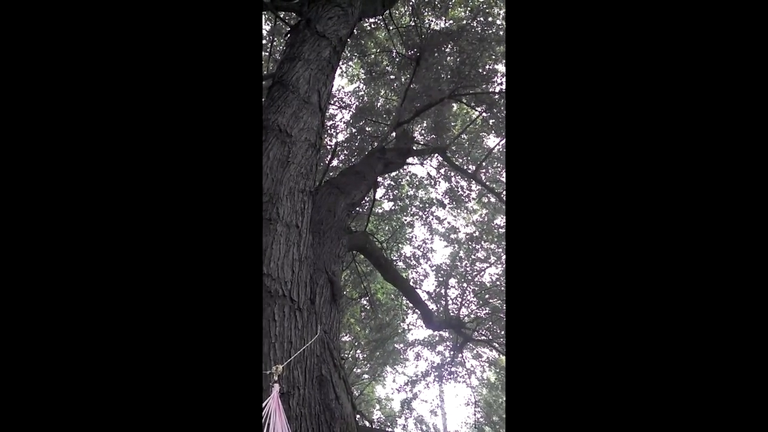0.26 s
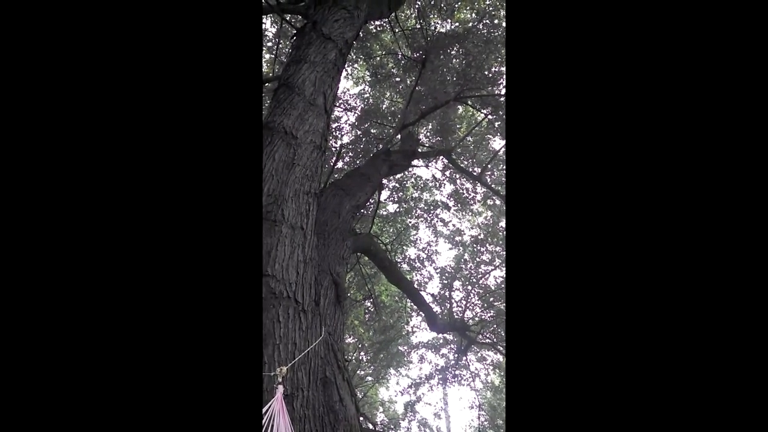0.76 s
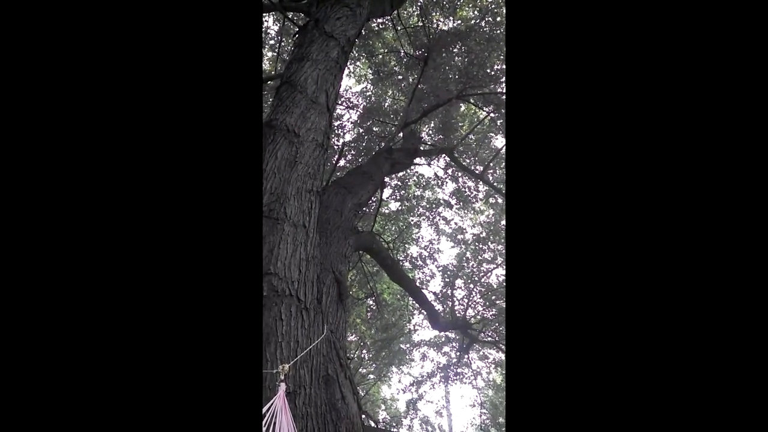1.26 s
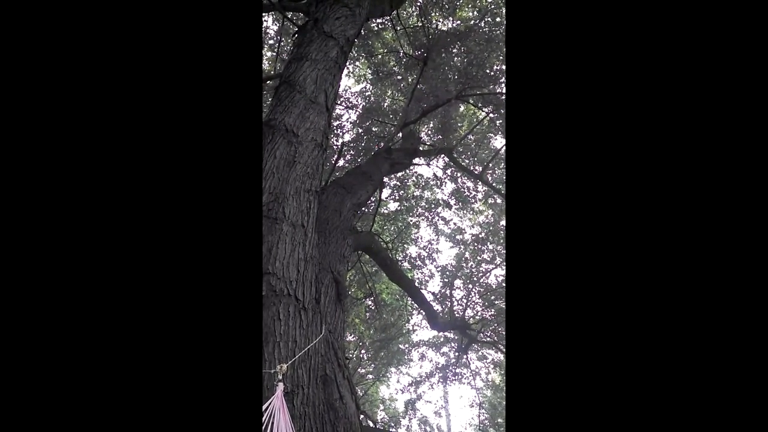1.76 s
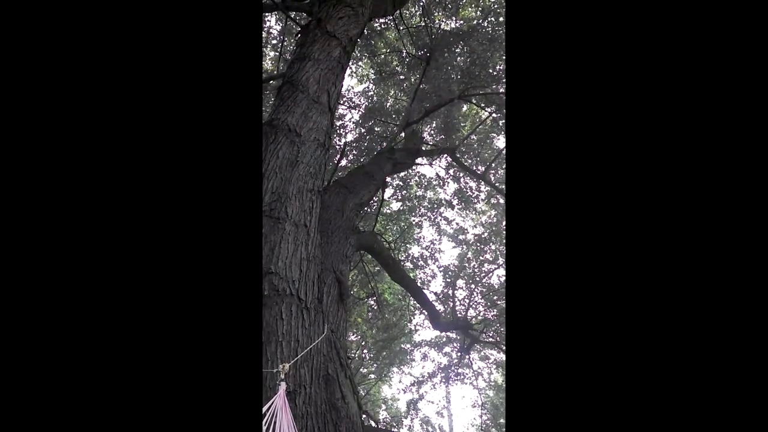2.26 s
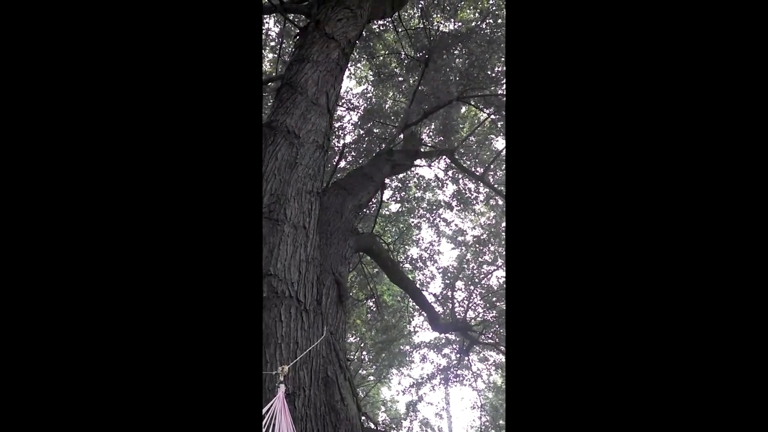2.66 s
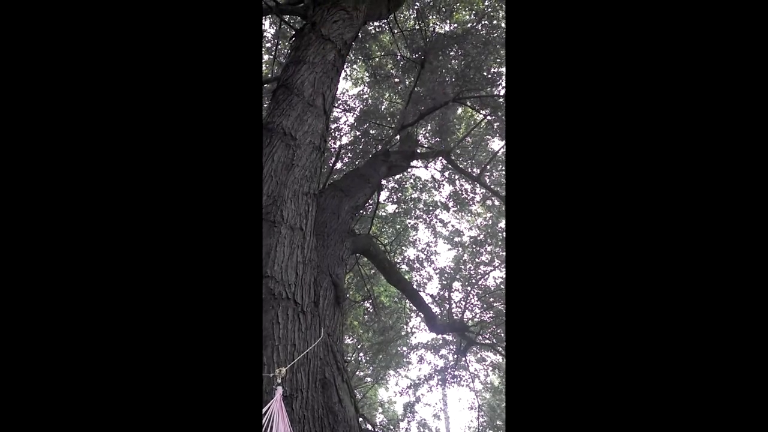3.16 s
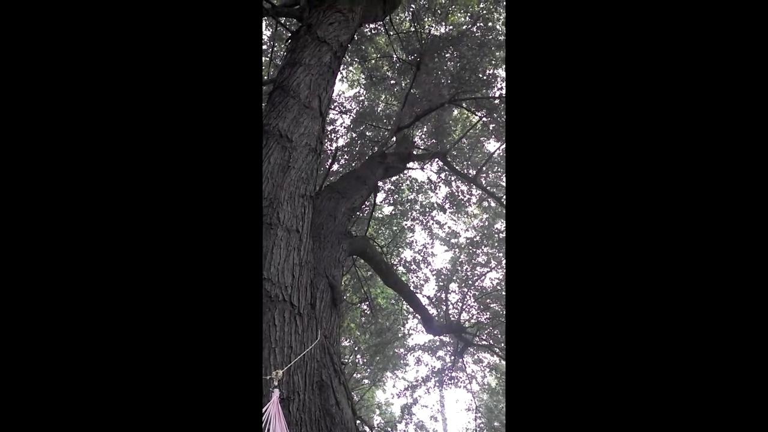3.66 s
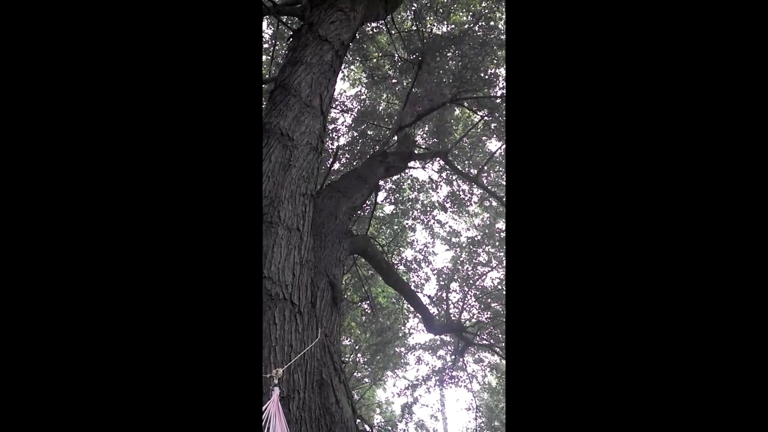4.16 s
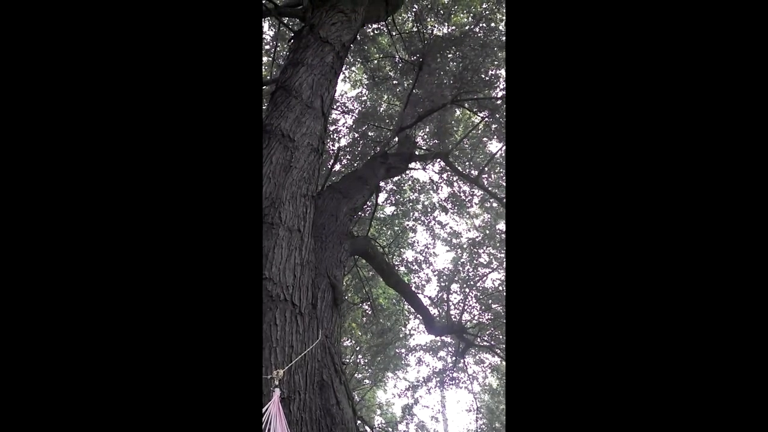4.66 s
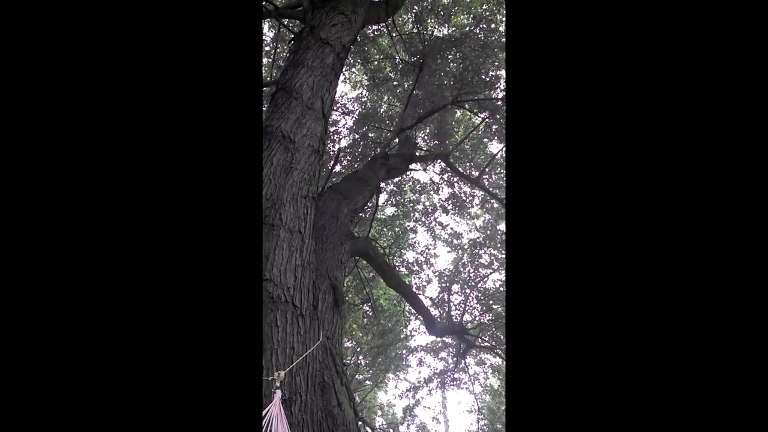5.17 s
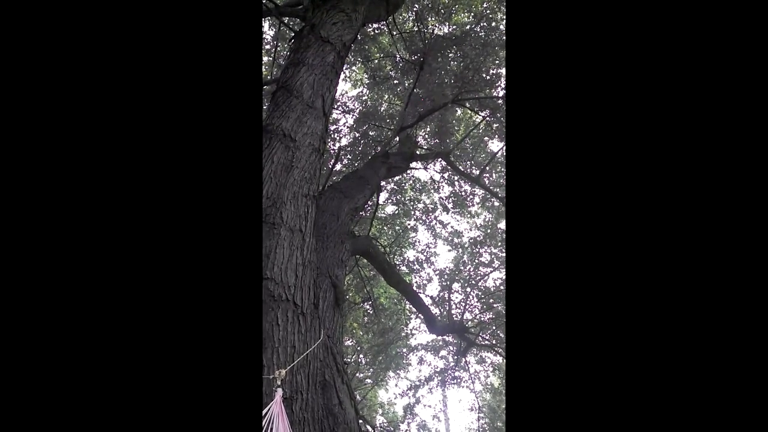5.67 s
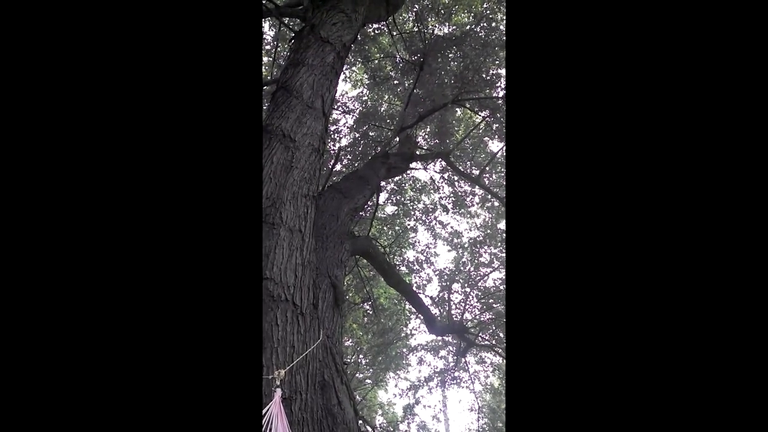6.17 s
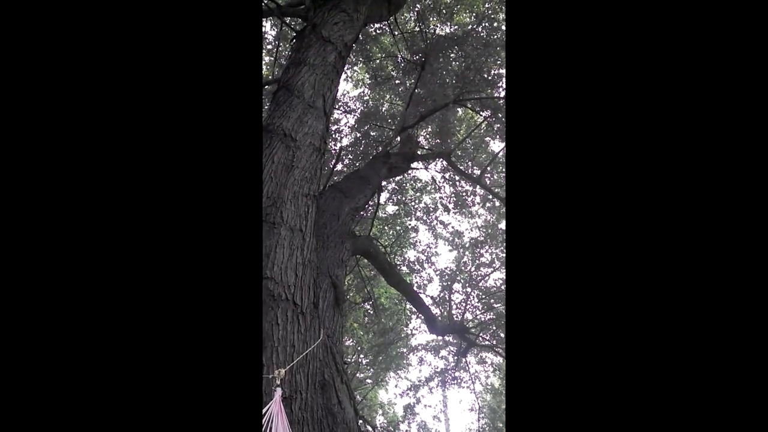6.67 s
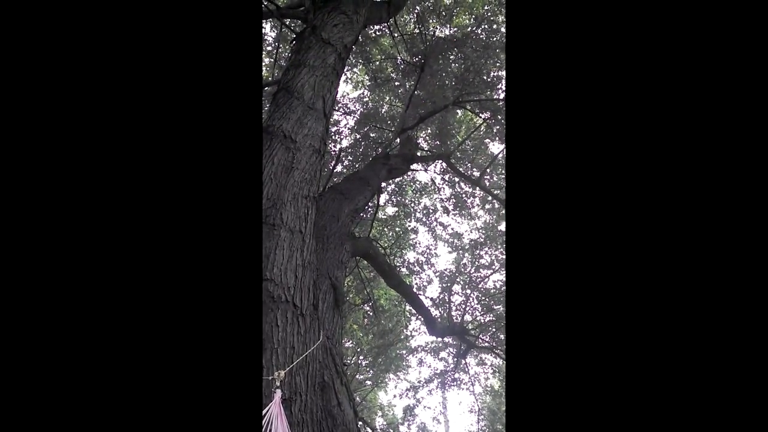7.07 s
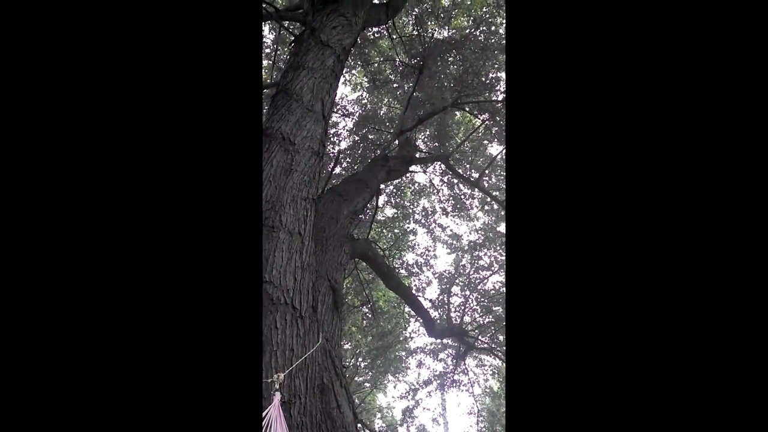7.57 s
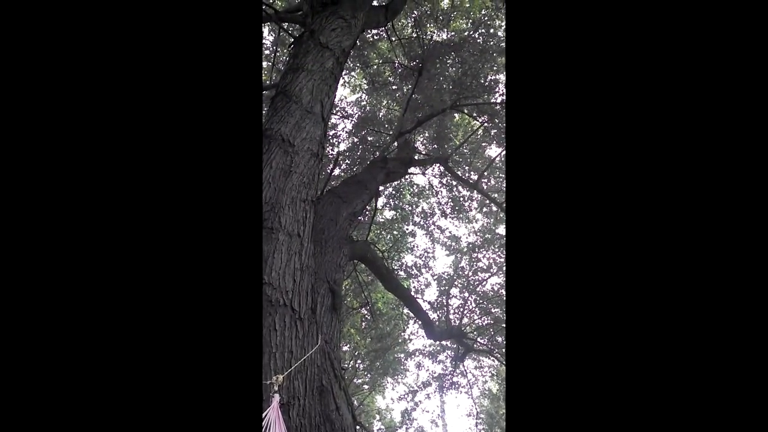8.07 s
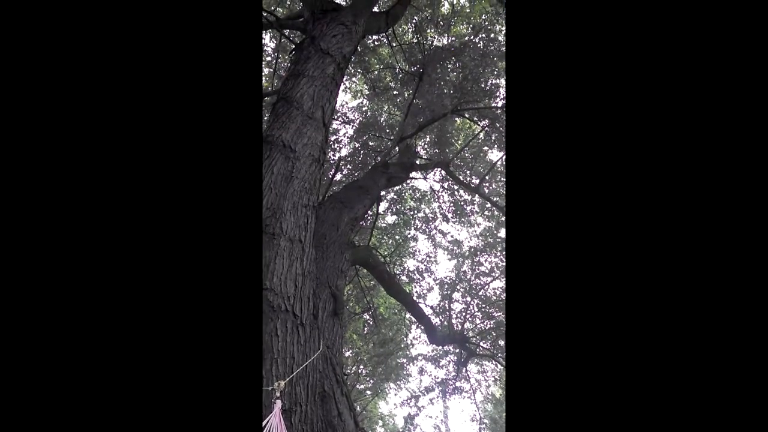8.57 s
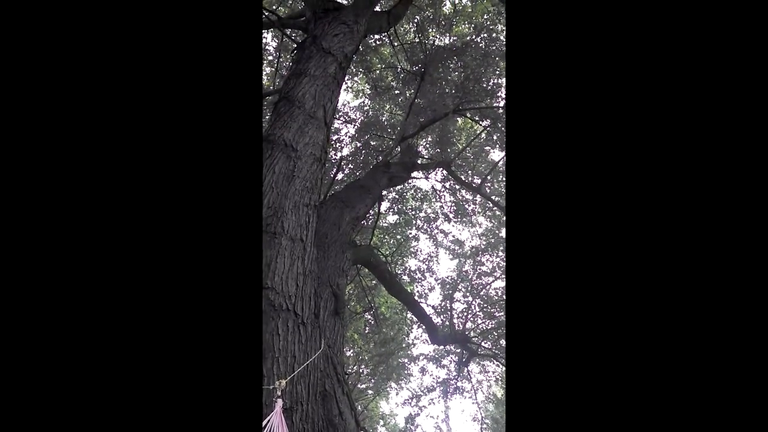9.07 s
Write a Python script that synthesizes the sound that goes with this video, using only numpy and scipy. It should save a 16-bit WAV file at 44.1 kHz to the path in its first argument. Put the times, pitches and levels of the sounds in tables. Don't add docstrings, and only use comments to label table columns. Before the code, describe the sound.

Scolding squirrel: stuttering chirps, strained raspy moans and sparse dry barks, with distant songbirds whistling above a quiet outdoor hush and faint engine hum.

```python
import sys
import numpy as np
from scipy import signal
from scipy.io import wavfile

SR = 44100
rng = np.random.default_rng(int(sys.argv[2]) if len(sys.argv) > 2 else 0)


def generate_wav(sig):
    pcm = np.round(np.clip(np.atleast_2d(sig).T, -1, 1) * 32767).astype(np.int16)
    wavfile.write(sys.argv[1], SR, pcm)


def amplitude_ratio(level_db):
    exponent = np.asarray(level_db, float) / 20
    return 10 ** exponent


N = 411012

BARK_LEAD_S = 0.014


def rms_one(x):
    return x / np.sqrt(np.mean(x ** 2) + 1e-20)


def in_time(rows, t):
    s, *columns = np.transpose(rows)
    return [np.interp(t, s, column) for column in columns]


def span(start, end):
    part = slice(round(start * SR), min(round(end * SR), N))
    return part, np.arange(part.start, part.stop) / SR


def at_hz(points, hz):
    point_hz, value = np.array(points).T
    return np.interp(np.log(hz), np.log(point_hz), value)


def drift(rate, size=N):
    r, run_in = np.exp(-2 * np.pi * rate / SR), int(SR / rate)
    noise = rng.standard_normal(size + run_in)
    return rms_one(signal.lfilter([1], [1, -2 * r, r * r], noise)[run_in:])


def resonate(x, modes):
    out, power = 0, 0
    for k, (hz, width_hz, level_db) in enumerate(modes):
        r = np.exp(-np.pi * width_hz / SR)
        top = (1 - r * r) / 2
        section = [top, 0, -top, 1, -2 * r * np.cos(2 * np.pi * hz / SR), r * r]
        ringing = signal.sosfilt([section, section], x)
        out = out + (-1) ** k * amplitude_ratio(level_db) * ringing
        power += amplitude_ratio(2 * level_db) * np.pi * width_hz / SR / 2
    return out / np.sqrt(power)


def folds(pitch, rough, alternate):
    size = len(pitch)
    waver = 1 + (.004 + .08 * rough ** 2) * drift(250, size)
    phase = 2 * np.pi * np.cumsum(pitch * waver) / SR
    pulses = 0
    for k in range(2, int(16000 / pitch.max()) + 1):
        fall_db = 8 * max(np.log2(k / 4.5), .4 * np.log2(4.5 / k))
        pulses = pulses + np.cos(k * phase) * amplitude_ratio(8 - fall_db + 3.5 * drift(50, size))
    pulses = pulses * np.sqrt(4 * pitch / SR)
    gate = 1 + .5 * np.cos(phase)
    breath = rng.standard_normal(size) * gate * amplitude_ratio(1.5 * drift(250, size))
    every_other = 1 + alternate * np.cos(phase / 2)
    return phase, every_other * np.sqrt(1 - rough) * pulses + np.sqrt(rough) * breath


def moans():
    # (start [s], length [s], first pitch [Hz], settled pitch [Hz], clear note level [dB])
    long_calls = [
        (.998, .315, 1040, 1115, -43),
        (3.981, .322, 915, 1150, -38),
        (9.196, .3, 770, 1075, -35),
    ]
    # (time [s], fundamental peak [dB], pitch [Hz], rasp peak [dB])
    short_calls = [(0.872, -63, 806, -51), (0.911, -64, 835, -46), (.953, -50.5, 890, -38),
                   (3.89, -63, 710, -40), (3.937, -43, 722, -34), (5.311, -63, 773, -47),
                   (5.36, -67, 820, -49), (5.398, -72, 820, -50), (5.44, -60, 773, -39),
                   (5.486, -46.5, 850, -34.5), (5.544, -46, 990, -32), (5.571, -61, 970, -46.5),
                   (9.152, -50.5, 683, -44)]
    # (frequency [Hz], width [Hz], level [dB])
    throat = [(800, 600, -11), (1250, 300, -11), (1680, 350, -11), (2010, 230, 0), (2330, 250, -13),
              (3600, 800, -13), (4480, 380, -7), (5700, 1300, -17), (7200, 1200, -10), (8100, 900, -11),
              (9100, 900, 0), (9750, 600, -5), (12700, 2600, -19), (15400, 450, -14)]
    dull_throat = [(hz, width_hz, db - 7.0 * (hz > 6800)) for hz, width_hz, db in throat]

    calls = [(moan(*row), throat) for row in long_calls]
    calls += [(stammer(), dull_throat)]
    calls += [(chirp(*row), throat) for row in short_calls]
    out = np.zeros(N)
    for (part, pitch, low_db, rasp_db, rough, alternate), mouth in calls:
        phase, airflow = folds(pitch, rough, alternate)
        out[part] += np.sqrt(2) * amplitude_ratio(low_db) * np.sin(phase)
        out[part] += amplitude_ratio(rasp_db) * resonate(airflow, mouth)
    return out


def moan(start, length, first_hz, settled_hz, note_db):
    settle_s, break_takes_s = 0.028, 0.032
    strain_hz, strain_s = 1310, 0.06
    attack_s, release_s, edge_depth_db = 0.007, 0.03, 16
    clear_rough, broken_rough = 0.3, 0.7

    part, t = span(start, start + length)
    age = t - start
    break_s = 0.066 + 5.5e-5 * (920 - first_hz)
    broken = np.clip((age - break_s) / break_takes_s + .5, 0, 1)
    since = np.maximum(age - break_s, 0)

    pitch = settled_hz + (first_hz - settled_hz) * np.exp(-age / settle_s)
    pitch += (strain_hz - settled_hz) * (1 - np.exp(-since / strain_s))

    fade_in = np.maximum(1 - age / attack_s, 0)
    fade_out = np.maximum(1 - (length - age) / release_s, 0) ** 1.16
    edge_db = -edge_depth_db * (fade_in + fade_out)

    clear_note_db = note_db - 64 * age
    broken_note_db = -42.5 - 28 * since
    low_db = (1 - broken) * clear_note_db + broken * broken_note_db

    swell_db = 3 * (1 - (age / length / 0.51 - 1) ** 2)
    clear_rasp_db = -45.5 + 0.03 * (pitch - 1080) + 75 * age
    rasp_db = (1 - broken) * clear_rasp_db + broken * (-36.5 + swell_db)

    rough = clear_rough + (broken_rough - clear_rough) * broken
    return part, pitch, low_db + edge_db, rasp_db + edge_db, rough, .7 * broken


def stammer():
    # (time [s], pitch [Hz], effort [dB], roughness [0-1])
    zigzag = [
        (5.611, 1153, -69, 0.77),
        (5.618, 1172, -43, 0.54),
        (5.637, 1053, -42, 0.58),
        (5.658, 1272, -56, 0.38),
        (5.699, 1127, -48.5, 0.47),
        (5.721, 1186, -48, 0.3),
        (5.736, 1310, -50, 0.4),
        (5.771, 1440, -74, .3),
        (5.785, 1420, -78, 0.1),
    ]
    part, t = span(zigzag[0][0], zigzag[-1][0])
    pitch, effort_db, rough = in_time(zigzag, t)
    rasp_db = -45.5 + 0.33 * (effort_db + 44.5)
    return part, pitch, effort_db, rasp_db, np.clip(rough, 0, 1), .2


def chirp(s, low_db, hz, db):
    length_s = 0.027
    # (time [s], fundamental [dB], rasp [dB])
    rows = [(s - .004, low_db - 12, db - 20),
            (s + 0.0052, low_db + 8.0, db - 14),
            (s + length_s - .006, low_db - 21, db - 22.5),
            (s + length_s, low_db - 21, db - 54)]
    part, t = span(rows[0][0], rows[-1][0])
    blip_db, rasp_db = in_time(rows, t)
    return part, np.full(len(t), float(hz)), blip_db, rasp_db, .75, 0


def barks():
    # (start [s], length [s], top pitch [Hz], chest peak [dB], rasp peak [dB])
    calls = [
        (2.96, 0.087, 430, -43.5, -41.5),
        (3.074, 0.022, 450, -57, -64),
        (7.17, 0.084, 468, -44.5, -40.5),
        (7.481, .066, 412, -48, -44.5),
        (7.804, 0.0737, 466.6, -44.5, -40.5),
        (8.093, 0.065, 430, -45, -40.5),
        (8.583, 0.081, 470, -43.5, -40),
    ]
    # (frequency [Hz], width [Hz], level [dB])
    chest = [(430, 260, -2), (880, 450, -2), (1350, 500, 0), (2000, 700, -8)]
    open_mouth = [(676, 180, 6.5), (1455, 240, -2.5), (1776, 210, -2.5), (2430, 190, 6), (3380, 73, -11)]
    teeth = [(3500, 500, -15), (4650, 400, -13), (6000, 600, -11), (6900, 1300, -6), (8300, 1200, -8),
             (10000, 1300, 0), (12300, 2200, -6), (14900, 1500, -5)]
    breaks_s = 0.052

    out = np.zeros(N)
    for call in calls:
        rows = bark_shape(*call)
        part, t = span(rows[0][0], rows[-1][0])
        pitch, chest_db, rasp_db = in_time(rows, t)
        opening = np.clip((t - t[0] - BARK_LEAD_S) / breaks_s - .2, 0, 1) ** 1.5
        phase, airflow = folds(pitch, .3 + .6 * opening, 0)
        airflow += 2.0 * np.sqrt((1 - opening) * 4 * pitch / SR) * np.cos(phase)
        closed_voice = np.sqrt(1 - opening) * resonate(airflow, chest) * amplitude_ratio(-2.5)
        open_voice = np.sqrt(opening) * resonate(airflow, open_mouth)
        gate = 1 + .4 * np.cos(phase)
        hiss = rng.standard_normal(len(t)) * gate * amplitude_ratio(1.8 * drift(150, len(t)))
        bark = amplitude_ratio(chest_db + 4.53) * (closed_voice + open_voice)
        bark += amplitude_ratio(rasp_db + 8.0) * resonate(hiss, teeth)
        out[part] += signal.windows.tukey(len(t), .2) * bark
    return out


def bark_shape(start, length, top_hz, chest_db, rasp_db):
    # (at the thump [dB], at the dip [dB], at the end [dB])
    chest_drop = (-2.5, -4, -9)
    rasp_drop = (-9, -4, -16)
    first_hz, last_hz, lead_db = 366.7, 430, -23
    dip_hz = first_hz + 0.588 * (top_hz - first_hz)
    thump_rasp_db = rasp_db + rasp_drop[0]
    return [(start - BARK_LEAD_S, first_hz, chest_db + 2 * lead_db, thump_rasp_db + lead_db),
            (start - .001, first_hz, chest_db + 2 * lead_db, thump_rasp_db + lead_db / 2),
            (start + 0.0057, first_hz, chest_db + chest_drop[0], thump_rasp_db),
            (start + 0.227 * length, dip_hz, chest_db + chest_drop[1], rasp_db + rasp_drop[1]),
            (start + 0.69 * length, top_hz, chest_db, rasp_db),
            (start + length, last_hz, chest_db + chest_drop[2], rasp_db + rasp_drop[2])]


def songbirds():
    out = np.zeros(N)
    flutter = amplitude_ratio(3.5 * drift(60))
    warble = 1 + .012 * drift(60)
    for start, length, first_hz, last_hz, level_db in bird_notes():
        part, t = span(start, start + length)
        glide = np.linspace(first_hz, last_hz, len(t)) * warble[part]
        whistle = np.sin(2 * np.pi * np.cumsum(glide) / SR)
        out[part] += amplitude_ratio(level_db + 1.5) * signal.windows.tukey(len(t), .5) * whistle
    return out * flutter


def bird_notes():
    # (start [s], length [s], pitch [Hz], level [dB])
    whistles = [(0.856, 0.06, 3370, -57), (1.45, .12, 3050, -63), (1.81, 0.051, 3190, -59),
                (1.888, .07, 2650, -56), (2.782, 0.076, 2100, -59), (1.955, .03, 4700, -64),
                (3.046, .04, 3700, -53), (3.469, 0.066, 3150, -53.5), (3.767, 0.06, 3530, -51),
                (3.79, 0.045, 2120, -55.5), (3.856, .08, 2290, -47), (5.923, 0.17, 2680, -50),
                (5.953, 0.2, 2353, -52), (7.078, .11, 2366, -48), (7.04, .04, 3420, -65),
                (7.55, 0.046, 2500, -58), (8.168, 0.065, 2570, -53), (8.68, 0.031, 3200, -58),
                (8.998, 0.062, 2620, -56), (2.65, 0.11, 2600, -53), (3.271, 0.13, 2590, -51)]
    # (start [s], length [s], first pitch [Hz], last pitch [Hz], level [dB])
    slurs = [(0.433, .1, 3500, 3120, -62), (2.4, 0.071, 2590, 3170, -53), (3.232, 0.1, 3930, 4360, -60),
             (3.653, 0.067, 4390, 3470, -53.5), (3.714, 0.056, 3000, 3250, -50),
             (4.56, .05, 2700, 3100, -51), (6.029, 0.045, 2300, 2070, -61), (8.947, .06, 2065, 2500, -59),
             (4.421, 0.17, 2690, 2384, -47.5), (5.381, 0.16, 2700, 2342, -44),
             (5.817, 0.089, 2570, 2950, -42), (6.987, 0.14, 2714, 2450, -44)]
    # (time into it [s], length [s], first pitch [Hz], last pitch [Hz], level [dB])
    phrase = [
        (0, .05, 2750, 2830, -52),
        (.07, .18, 2950, 2990, -58),
        (.05, .15, 3670, 3650, -56),
        (.1, .22, 2290, 2285, -55),
    ]
    # (time [s], gain [dB])
    phrase_starts = [
        (4.81, 0.24),
        (6.36, -0.76),
    ]
    # (start [s], chips [count], first level [dB], rise per chip [dB])
    trills = [
        (2.08, 10, -57, 0.64),
        (6.275, 5, -60.5, 1),
    ]
    # (length [s], first pitch [Hz], last pitch [Hz])
    chip = (0.026, 4550, 4900)
    gap_s, hurry_s, hurry_kept = 0.122, 0.02, 0.55

    sung = [(s, length, hz, hz, db) for s, length, hz, db in whistles] + slurs
    for start, gain_db in phrase_starts:
        for s, length, first_hz, last_hz, db in phrase:
            sung.append((start + s, length, first_hz, last_hz, db + gain_db))
    for start, count, db, step_db in trills:
        for k in range(int(count)):
            hurried_s = hurry_s * (1 - hurry_kept ** k) / (1 - hurry_kept)
            sung.append((start + gap_s * k - hurried_s, *chip, db + step_db * k))
    return sung


def yard(x, alike, tail_db, tail_t60):
    # (delay [s], level [dB])
    echoes = [
        (0.034, -6.5),
        (0.072, -22),
        (0.117, -20.5),
        (.17, -31),
        (0.256, -35.5),
    ]
    t = np.arange(round(.5 * SR)) / SR
    spread = amplitude_ratio(tail_db - 60 * t / tail_t60) * np.ones((2, 1))
    for delay, level_db in echoes:
        spread += amplitude_ratio(level_db - 36.5) * np.exp(-((t - delay) / 0.026) ** 2)
    response = signal.lfilter([.5], [1, -.5], spread * rng.standard_normal(spread.shape))
    scatter = rng.standard_normal(len(t)) * np.exp(-t / .002)
    alike = np.clip(alike, 0, 1)
    response[1] += np.sqrt(1 - alike ** 2) * scatter / np.linalg.norm(scatter)
    response[:, 0] += [1, alike]
    return signal.fftconvolve(x[None], response, axes=1)[:, :N]


def drone():
    # (time [s], pitch [Hz], level [dB])
    engine = [(0.0, 78.4, -48), (0.15, 101.4, -63), (0.67, 95.9, -44.5), (1.71, 97.14, -48),
              (2.65, 88.1, -51), (3.24, 86.2, -59), (3.71, 101.3, -78), (3.97, 79.9, -55),
              (4.36, 93.7, -64), (4.46, 82.5, -58), (4.67, 86.2, -61), (7.14, 83.7, -49),
              (7.27, 86.05, -54.5), (9.11, 82, -59), (9.19, 88.2, -64), (9.32, 80.5, -65)]
    hz, level_db = in_time(engine, np.arange(N) / SR)
    level = np.sqrt(2) * amplitude_ratio(level_db + 1.9 * drift(2.9))
    return level * np.sin(2 * np.pi * np.cumsum(hz + 2.45 * drift(4.25)) / SR)


def fan():
    # (frequency [Hz], width [Hz], level [dB])
    hum = (232.4, 20.5, -59.5)
    hz, width_hz, level_db = hum
    return amplitude_ratio(level_db) * resonate(rng.standard_normal(N), [(hz, width_hz, 0)])


def hush(patchy_db):
    # (frequency [Hz], level per Hz [dB])
    spectrum = [(45, -6.5), (100, 0.5), (220, -3.5), (400, -14), (700, -16), (1300, -14.5), (2000, -20),
                (2600, -18.5), (3300, -17), (4500, -37), (6000, -25), (9000, -40.5), (12500, -37),
                (16000, -42.5)]
    # (frequency [Hz], likeness [0-1])
    likeness = [(40, 0), (100, 0), (220, 0.84), (400, 0.19), (1200, 1), (3300, 0), (4500, 0.71),
                (9000, 0.024)]
    out, edges = 0, 25 * 2 ** np.arange(0, 9.6, .5)
    white = rng.standard_normal((2, 2, N))
    for k, (low, high) in enumerate(zip(edges, edges[1:])):
        band = signal.butter(2, [low, high], "band", fs=SR, output="sos")
        common, own = signal.sosfilt(band, white[k % 2])
        hz = np.sqrt(low * high)
        alike = np.clip(at_hz(likeness, hz), 0, 1)
        second = alike * common + np.sqrt(1 - alike ** 2) * own
        out = out + amplitude_ratio(at_hz(spectrum, hz) + patchy_db * drift(2.7)) * np.array([common, second])
    port_range = signal.butter(5, [44, 14000], "band", fs=SR, output="sos")
    return amplitude_ratio(-45) * rms_one(signal.sosfilt(port_range, out))


def scene():
    squirrel = yard(moans() + barks(), alike=.85, tail_db=-43.5, tail_t60=0.18)
    birds = yard(songbirds(), alike=.5, tail_db=-35, tail_t60=.35)
    engine = drone() * np.array([[1], [.9]])
    return squirrel + birds + engine + fan() + hush(patchy_db=1.15)


def delayed(x, count):
    return np.pad(x, ((0, 0), (count, 0)))[:, :N]


def roll_off(x):
    return signal.sosfilt(signal.butter(12, 16670, fs=SR, output="sos"), x)


def record(dry):
    widen_samples = 16
    bass = signal.sosfilt(signal.butter(3, 400, fs=SR, output="sos"), dry)
    upper = signal.sosfilt(signal.butter(3, 400, "high", fs=SR, output="sos"), dry)
    late = delayed(upper, widen_samples)
    mid = (upper[0] - late[0]) / 2
    side = amplitude_ratio(-0.5) * (upper[1] + late[1]) / 2
    side = side - 0.11 * mid
    centred_bass = delayed(bass, widen_samples // 2) * amplitude_ratio([[-.8], [.8]])
    stereo = centred_bass + [mid + side, mid - side]
    return roll_off(stereo)


dry = scene()
out = record(dry)
generate_wav(out)
```